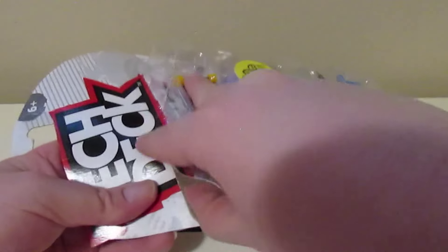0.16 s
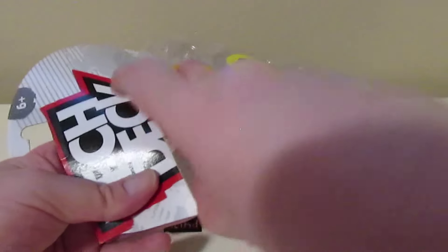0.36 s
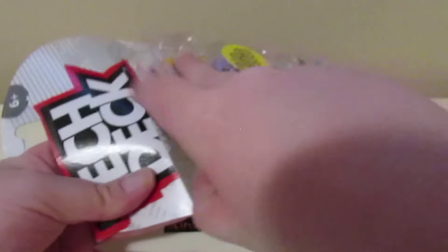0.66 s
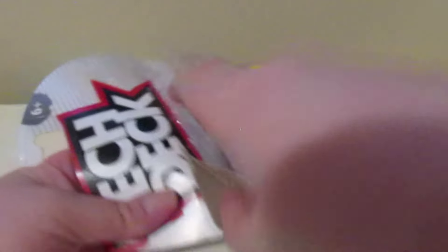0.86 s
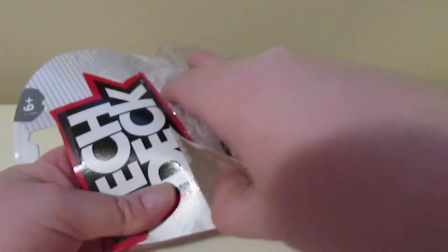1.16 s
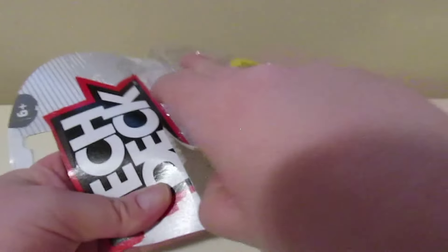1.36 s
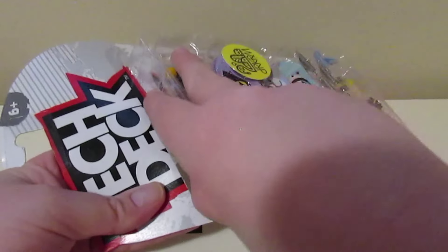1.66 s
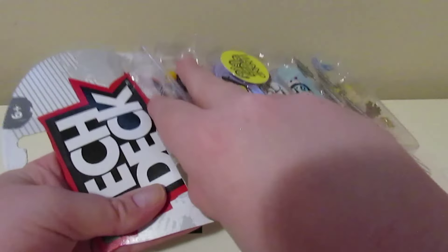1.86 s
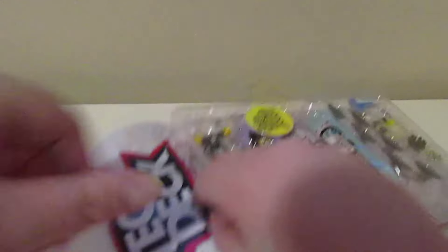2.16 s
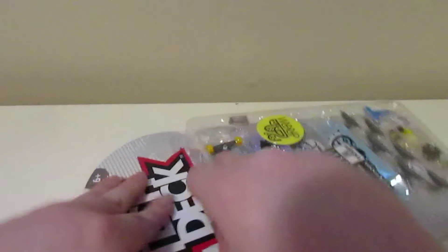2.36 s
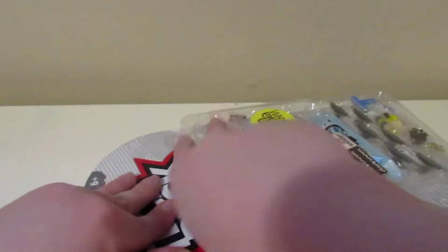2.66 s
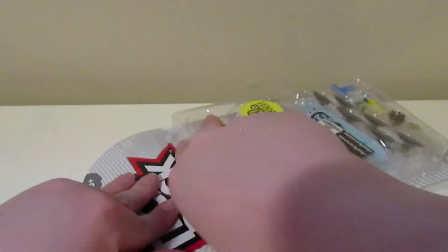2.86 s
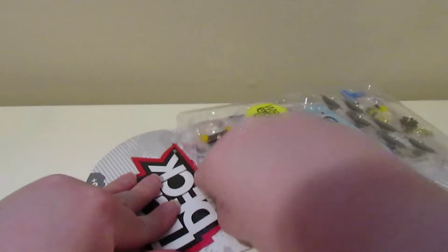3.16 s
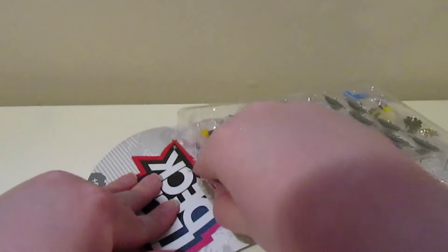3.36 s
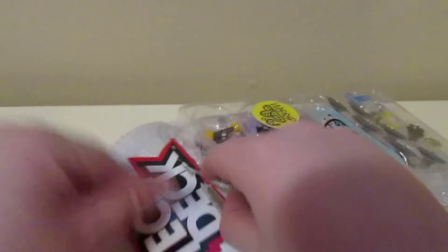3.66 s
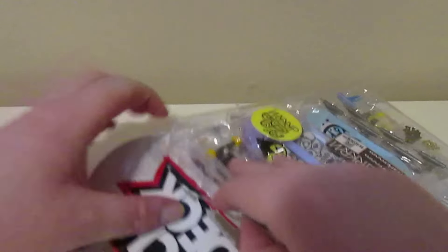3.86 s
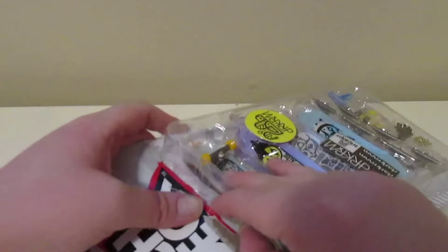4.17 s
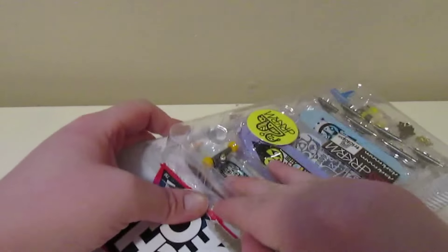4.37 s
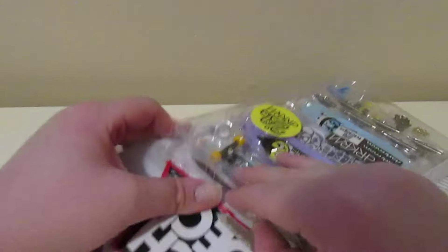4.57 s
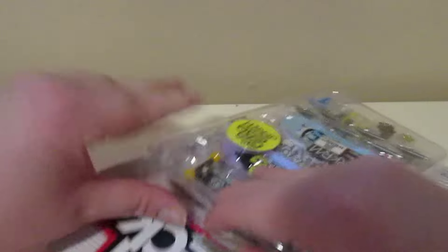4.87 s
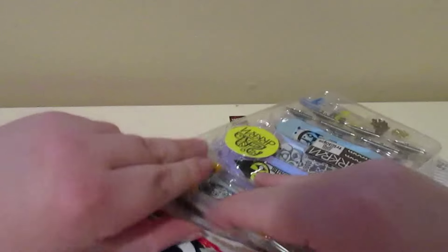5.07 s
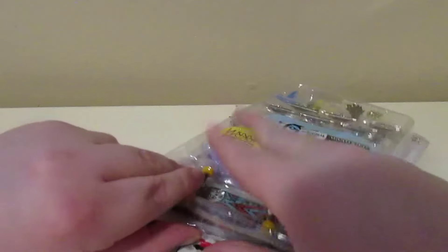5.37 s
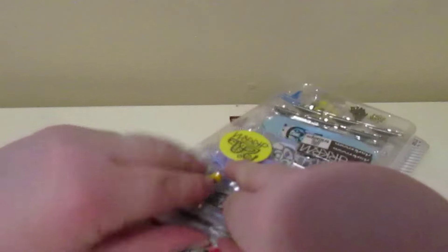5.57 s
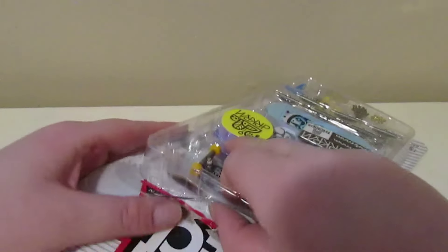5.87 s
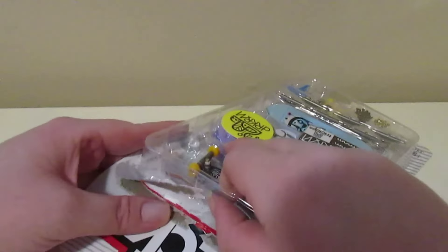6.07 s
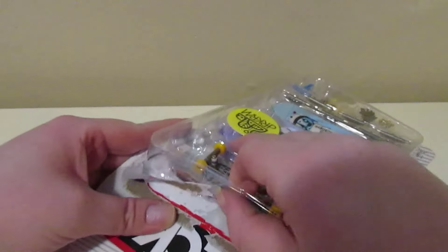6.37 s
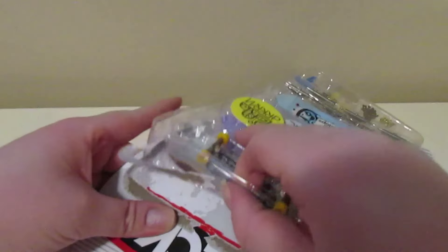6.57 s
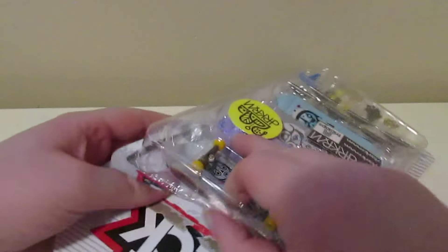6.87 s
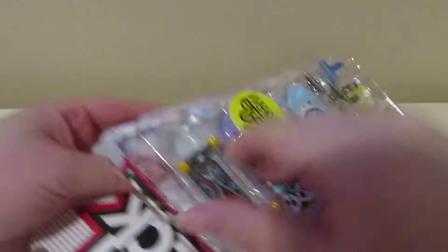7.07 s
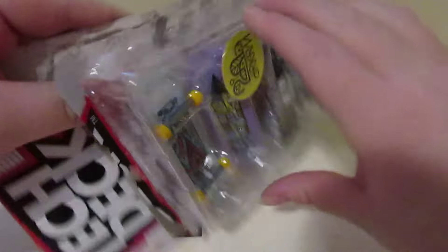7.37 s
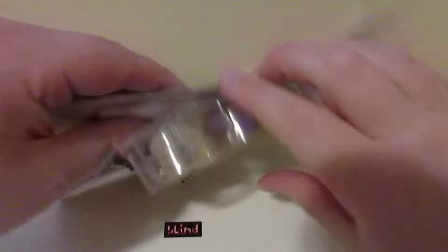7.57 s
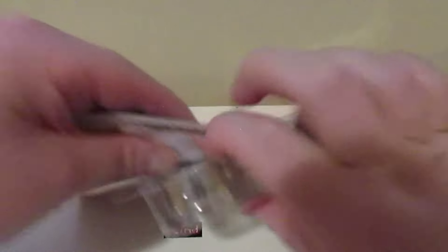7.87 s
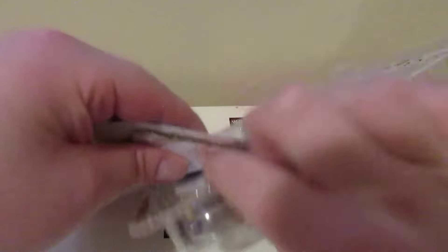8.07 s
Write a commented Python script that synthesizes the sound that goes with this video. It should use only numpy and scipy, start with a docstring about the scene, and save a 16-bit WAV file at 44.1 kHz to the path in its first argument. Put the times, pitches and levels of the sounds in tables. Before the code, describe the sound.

Irregular loud plastic cracks, small pops, card rubbing and brief glue tears, with a few dull table knocks, close up indoors over faint hiss.

```python
"""A stiff clear plastic blister is pried off its cardboard back by hand on a table in a small room.
Creases flip in sharp snaps: a step and a ragged noise burst through resonances of film and hollow.
Small dents ping, walls creak, glue tears in swells; fingers rub the card and crinkle the film.
The card slaps and slides on the table, with a few low thuds, over room tone and hiss.
Both channels are the same."""
import sys
import numpy as np
from scipy import signal
from scipy.fft import rfft, irfft, next_fast_len
from scipy.io import wavfile

SR = 44100
rng = np.random.default_rng(int(sys.argv[2]) if len(sys.argv) > 2 else 0)


def bounce(signal):
    """Save signal as a 16-bit WAV file at the path given by the first command-line argument."""
    frames = np.transpose(np.atleast_2d(signal))
    limited = np.clip(frames, -1, 1)
    pcm = np.round(limited * 32767).astype(np.int16)
    wavfile.write(sys.argv[1], SR, pcm)


N = 362943  # samples

# Room tone and microphone hiss, spectral shape: f/Hz, level/dB
QUIET_SPECTRUM = [(300, -5), (1000, -16.5), (4000, -18), (16000, -32)]
# Decay of walls and table top: f/Hz, t60/s
ROOM_DECAY = [(200, 0.19), (1400, 0.2), (9700, 0.22)]
# Card on the table, resonances: f/Hz, width/Hz, level/dB
CARD_MODES = [(291, 78, -9), (380, 240, -14.5)]
# Card slaps the table: t/s, level/dB
CARD_SLAPS = [(0.851, -28.5), (2.274, -27.5), (2.405, -21.5), (2.443, -23.5), (2.848, -14.5), (3.397, -30),
              (3.94, -32), (4.158, -28), (4.525, -25), (5.268, -27), (6.22, -20.5), (7.549, -19.5)]
# Low thuds, the one at 3.169 s a low bump under a loud snap: t/s, level/dB
LOW_THUDS = [(2.275, -35), (2.847, -20.5), (3.169, -32.5), (5.585, -30)]
# Handling levels, interpolated: t/s, rub of card and fingers/dB, crinkle of film/dB
HAND_LEVELS = [(0.0, -51.5, -56), (0.37, -44.5, -48.5), (1.72, -52, -51), (1.99, -36.5, -44),
               (2.25, -47.5, -53), (3.05, -38.5, -45), (3.21, -58.5, -48.5), (3.78, -49.5, -62),
               (4.56, -49.5, -47.5), (5.11, -51.5, -68), (5.91, -61, -74), (6.58, -81, -38),
               (6.85, -43.5, -80), (7.1, -51, -58), (7.47, -56, -66), (8.23, -44, -39.5)]
# Rub of card and fingers, spectral shape: f/Hz, level/dB
RUB_SPECTRUM = [(59, -28), (248, 7), (693, 4), (1750, -0.5), (6000, -21.5), (13200, -120)]
# Stirred film, spectral shape: f/Hz, level/dB
FILM_SPECTRUM = [(1200, -7.5), (3000, 0.5), (6500, 0.5), (15000, -11)]
# Card slides on the table: t of top/s, length/s, level/dB
CARD_SLIDES = [(7.211, 0.21, -45.5), (7.426, 0.034, -38)]
# Glue tears: t of top/s, length/s, level/dB, film re tear/dB
GLUE_TEARS = [(0.892, 0.1, -33, -7), (1.452, 0.042, -33, 7), (2.025, 0.029, -22.5, -5),
              (2.099, 0.086, -36.5, -2), (2.317, 0.061, -23, -19), (4.743, 0.17, -40, -5),
              (5.477, 0.074, -31.5, -19), (3.086, 0.023, -40.5, 8.5), (6.012, 0.18, -43.5, 4.5),
              (6.271, 0.061, -35.5, -1), (6.47, 0.12, -34.5, -3.5), (7.566, 0.084, -31, -6.5),
              (7.673, 0.021, -35.5, -14.5), (7.978, 0.067, -34.5, -21), (8.178, 0.084, -32.5, 2.5)]
# Air and walls of the blister, resonances: f/Hz, width/Hz, level/dB
HOLLOW_MODES = [(745, 2340, 8), (1155, 464, 14.5)]
# Soft slips of a blister wall: t/s, level/dB
WALL_CREAKS = [(0.575, -38), (0.855, -27.5), (1.813, -30), (1.849, -34), (2.445, -19), (3.5947, -32),
               (4.9546, -37), (5.2673, -20), (5.4334, -27.5), (6.147, -29), (6.221, -22), (6.413, -27.5),
               (6.705, -32.5), (6.771, -32.5), (7.501, -32)]
# Small dents pop: t/s, nominal peak level/dB, f/Hz
DENT_PINGS = [(0.3592, -16, 2280), (0.9614, -15, 2260), (1.885, -22, 3660), (2.1636, -12, 2750),
              (3.6324, -30, 5660), (3.936, -18, 2900), (4.032, -20, 3000), (4.0679, -15, 3200),
              (4.1637, -14.5, 3230), (4.2656, -21.5, 6200), (4.2973, -23.5, 3200), (4.468, -22, 5030),
              (4.6073, -25.5, 3030), (5.0876, -30, 2210), (5.725, -23, 4370), (6.305, -23.5, 3040),
              (6.849, -20, 2970), (7.9065, -29.5, 3370), (8.1656, -17, 2590), (8.2049, -16.5, 3730)]
# Creases flip: t/s, nominal peak level/dB, crack f/Hz, hollow re peak/dB, treble re rest/dB
CREASE_SNAPS = [(0.2559, -10.5, 3770, -16.5, -3), (0.4149, -1.5, 2340, -18, -10.5),
                (0.4386, -1, 2400, -10.5, -5.5), (0.4672, -7, 2030, -30, -7),
                (0.659, -8, 2160, -14.5, -0.5), (0.925, -10.5, 3000, -20.5, -4.5),
                (0.9744, -2.5, 2620, -17.5, -2), (1.1068, -2.5, 3030, -21.5, -3.5),
                (1.246, -13.5, 4250, -17.5, 2), (1.474, -4.5, 1980, -21, -4),
                (1.7709, -17.5, 3460, -11, -3), (1.91, -20, 1900, -2.5, -2.5),
                (2.2699, -7.5, 1800, -12, -7), (2.4066, -14.5, 1840, -1.5, 1.5),
                (2.6552, -4.5, 1790, -16.5, -2.5), (2.853, -20.5, 1980, 8.5, -3.5),
                (3.1143, -8.5, 7300, -15, 3.5), (3.169, -4, 1980, -14, 0), (3.4017, -22.5, 3940, -14, 4),
                (3.4278, -5.5, 2270, -11, -7.5), (3.4409, -5, 2270, -14, -3),
                (3.5531, -22.5, 1890, -2.5, -4.5), (4.5286, -0.5, 5650, -19.5, -7),
                (4.733, -15.5, 2150, -5, 0.5), (5.1086, -6.5, 3350, -9, 0.5), (5.175, -21, 1820, -5, -1),
                (5.233, -12.5, 3880, -9.5, 3), (5.5529, -13, 4970, -4, 4.5),
                (5.582, -5.5, 2230, -14.5, -8.5), (5.662, -13, 5500, -17.5, 4.5),
                (5.7531, -14.5, 4840, -10.5, -2), (6.011, -2.5, 6500, -9.5, -1),
                (6.0336, -2.5, 4600, -16, -6.5), (6.042, -13, 2740, -22, -1), (6.5375, -4, 1860, -7, -4),
                (6.6315, -6, 2530, -18.5, -12.5), (6.7313, -13, 2150, -15.5, -3.5),
                (6.8654, -17.5, 3580, -11.5, -1.5), (6.92, -10.5, 4330, -12, 4.5),
                (6.9342, -8.5, 1920, -15, -4.5), (7.01, -20, 2220, -3, -3), (7.0299, -16, 2130, -8, -3.5),
                (7.5521, -13.5, 2360, -3.5, -3)]

SLIDE_HZ, TEAR_HZ = 607, 980  # broad pitches
GRIT_RATIO = .9  # creases re even rub
CRACK_DB = -8.5  # crack burst re nominal peak
STEP_PER_KHZ = 3.4  # leading step of a crack: small, high dents flip most abruptly
SIZZLE_DB, SIZZLE_DB_PER_RING_DB = -31.5, -1.18  # less hollow ring, more sizzle
TREBLE_HZ = 6160  # corner of the treble shelf of a snap
TOP_HZ = 16300  # band limit


def amp(db):
    """Decibels to amplitude ratio."""
    return 10 ** (np.asarray(db) / 20)


def unit(x):
    """Scales each row to rms 1."""
    return x / np.sqrt(np.mean(x ** 2, axis=-1, keepdims=True) + 1e-20)


def along(points, hz):
    """Interpolates (f/Hz, value) points on a log frequency axis."""
    f, v = np.transpose(points)
    return np.interp(np.log(hz + 1), np.log(f + 1), v)


def filtered(x, response):
    """Multiplies the spectrum of x by a complex frequency response."""
    n = x.shape[-1]
    m = next_fast_len(n + 4096)
    return irfft(rfft(x, m) * response(np.fft.rfftfreq(m, 1 / SR)), m)[..., :n]


def peak(f, hz, width_hz):
    """Response of one causal resonance."""
    return 1j * f * width_hz / (hz * hz - f * f + 1j * f * width_hz)


def modes(table):
    """Response of parallel resonances of alternating sign."""
    return lambda f: sum((-1) ** k * amp(db) * peak(f, hz, w) for k, (hz, w, db) in enumerate(table))


def place(rows, times_s):
    """Sums short sounds into one track."""
    at = np.round(times_s * SR).astype(int)[:, None] + np.arange(rows.shape[1])
    return np.bincount(at.ravel(), rows.ravel(), N + SR)[:N]


def shaken(t60_s, spike, response, level_db):
    """One ragged burst per row, led by a sharp step, through a body; a fainter tail mutters on."""
    t = np.arange(SR // 9) / SR
    lumps = np.repeat(rng.standard_normal((len(level_db), len(t) // 50)), 50, axis=1)
    fade = amp(-60 * t / t60_s) + amp(-8.5 - 60 * t / 0.14)
    burst = rng.standard_normal((len(level_db), len(t))) * amp(3.1 * lumps) * fade
    burst *= 1 - np.exp(-t / 0.00027)
    burst[:, 0] = -spike
    # level: rms with the energy of the row packed into 256 samples
    return amp(level_db) * unit(filtered(burst, response)) * np.sqrt(256 / len(t))


def crackle(count, spread_db, t60_s):
    """Noise swelling in random slips of unequal size, each a short puff, on an even bed."""
    start, size = rng.random((count, 2)).T
    t = np.arange(SR // 30) / SR
    puff_power = amp(-120 * t / t60_s) * (1 - np.exp(-t / .0015))
    slip_power = amp(-spread_db * np.log(size + .06))[:, None] ** 2
    power = place(slip_power * puff_power, start * N / SR)
    return np.sqrt(power / np.median(power) + 1.08) * rng.standard_normal(N)


def grit(count, hz, cycles, spread_db):
    """Clumps of tiny creases, each a brief chirp at its own pitch, most near one pitch."""
    clump, lag, size, high = rng.random((count, 4)).T[:, :, None]
    start_s = np.floor(clump * 160) / 160 * N / SR + .06 * lag
    pitch_hz = hz * 5 ** (high ** 2.5 - .12)
    t = np.arange(SR // 60) / SR
    envelope = pitch_hz * t * np.exp(-pitch_hz * t / cycles)
    rows = amp(-spread_db * np.log(size + 0.04)) * envelope * np.sin(2 * np.pi * pitch_hz * t)
    return unit(place(rows, start_s[:, 0]))


def swells(top_s, length_s, db, hz, breadth, film_db):
    """Dense fine slips swell and fade around a broad pitch and stir the film."""
    half = SR // 4
    slips = crackle(count=2500, spread_db=5.5, t60_s=0.02)
    rows = slips[(np.arange(len(top_s))[:, None] * half + np.arange(2 * half)) % N]

    def body_response(f):
        pitch = peak(f, hz, breadth * hz) + 1.4 * peak(f, hz, 0.14 * hz)
        return pitch * peak(f, hz, 3.6 * breadth * hz)

    body = unit(filtered(rows, body_response))
    film = unit(filtered(rows, lambda f: amp(along(FILM_SPECTRUM, f))))
    swell = amp(db) * np.exp(-(2 * np.arange(-half, half) / SR / length_s) ** 2)
    return place(swell * (body + amp(film_db) * film), top_s[:, 0] - half / SR)


def random_colour(count):
    """Each burst is coloured by nine randomly drawn narrow resonances."""
    hz = 600 * 9 ** rng.random((count, 9))
    return lambda f: 1 + .9 * sum(peak(f, hz[:, [k]], .07 * hz[:, [k]]) for k in range(hz.shape[1]))


def quiet():
    """Room tone and hiss as shaped noise, with a thin fuzzy whine high up."""
    tone = unit(filtered(rng.standard_normal(N), lambda f: amp(along(QUIET_SPECTRUM, f))))
    whine = unit(filtered(rng.standard_normal(N), lambda f: peak(f, 11700, 620) ** 2))
    return amp(-57) * tone + amp(-72) * whine


def room(x):
    """Near walls and table top: each frequency dies at its own speed; a new noise tail every 0.1 s."""
    step, delay = SR // 10, 130  # samples
    wet = np.zeros(N + SR)
    for a in range(0, N, step):
        hz, t, z = signal.stft(rng.standard_normal(SR // 3), SR, nperseg=256)
        decay = amp(-60 * t / along(ROOM_DECAY, hz)[:, None])
        tail = signal.istft(z * decay, SR, nperseg=256)[1]
        answer = signal.fftconvolve(x[a:a + step], tail / np.linalg.norm(tail))
        wet[a + delay:][:len(answer)] += answer
    return wet[:N]


def thuds():
    """Low thuds: a strong step and a noise burst through two low resonances."""
    s, db = np.transpose(LOW_THUDS)[:, :, None]
    return place(shaken(0.099, 14, lambda f: peak(f, 146, 32.0) + 0.88 * peak(f, 87, 67), db), s[:, 0])


def knocks():
    """The card slaps the table and rings low."""
    s, db = np.transpose(CARD_SLAPS)[:, :, None]
    return place(shaken(0.065, 4.9, lambda f: modes(CARD_MODES)(f) * peak(f, 190, 760), db), s[:, 0])


def slides():
    """The card slides on the table: lower than a tear, the film nearly still."""
    top_s, length_s, db = np.transpose(CARD_SLIDES)[:, :, None]
    return swells(top_s, length_s, db, SLIDE_HZ, breadth=0.65, film_db=-45)


def handling():
    """Fingers slide on the card and bend the film; shared slips sound in both, the rub rings the hollow."""
    s, rub_db, film_db = np.transpose(HAND_LEVELS)
    t = np.arange(N) / SR
    shared = crackle(count=700, spread_db=3.5, t60_s=.04)
    film_slips = shared + crackle(count=1800, spread_db=10, t60_s=0.025)
    rub = filtered(shared, lambda f: amp(along(RUB_SPECTRUM, f)) * (1 + 0.26 * peak(f, 970, 240)))
    film = filtered(film_slips, lambda f: amp(along(FILM_SPECTRUM, f)))
    creases = grit(count=1800, hz=1168, cycles=1.6, spread_db=4.5)
    rub_part = amp(np.interp(t, s, rub_db)) * (unit(rub) + GRIT_RATIO * creases)
    return rub_part + amp(np.interp(t, s, film_db)) * unit(film)


def tears():
    """Glue lets go in short swells of fine slips that stir the film."""
    top_s, length_s, db, film_db = np.transpose(GLUE_TEARS)[:, :, None]
    return swells(top_s, length_s, db, TEAR_HZ, 1.55, film_db)


def creaks():
    """A blister wall slips without cracking: a short chirp of the hollow with a faint edge."""
    s, db = np.transpose(WALL_CREAKS)[:, :, None]
    return place(shaken(0.023, 0.96, lambda f: modes(HOLLOW_MODES)(f) * peak(f, 1280, 1900), db), s[:, 0])


def pings():
    """A small dent pops: a short burst around its own pitch, low in treble, that stirs the hollow."""
    s, db, hz = np.transpose(DENT_PINGS)[:, :, None]
    colour = random_colour(count=len(s))

    def body(f):
        ring = peak(f, hz, 0.98 * hz) ** 2 + 0.21 * modes(HOLLOW_MODES)(f)
        return ring * colour(f) / (1 + 1j * f / (2 * hz)) ** 4

    return place(shaken(0.015, 6.7, body, db + CRACK_DB), s[:, 0])


def snaps():
    """A crease flips: a sharp step and a burst of tiny fractures shake film and hollow."""
    s, db, hz, ring_db, treble_db = np.transpose(CREASE_SNAPS)[:, :, None]
    treble, colour = amp(treble_db), random_colour(count=len(s))

    def crack_response(f):
        # high dents ping more clearly
        pitch = hz / 3000 * peak(f, hz, 680) + 1.15 * peak(f, 3500, 5100)
        return pitch * peak(f, hz, 5700)

    def shell_response(f):
        x = f / TREBLE_HZ
        lowpass = 1 / (1 + 1j * np.sqrt(2) * x - x ** 2) ** 2
        return (treble + (1 - treble) * lowpass) * amp(-3.5) * colour(f)

    sizzle_db = db + SIZZLE_DB + SIZZLE_DB_PER_RING_DB * ring_db
    crack = shaken(0.012, STEP_PER_KHZ * hz[:, 0] / 1e3, crack_response, db + CRACK_DB)
    hollow = shaken(0.017, 0.42, lambda f: modes(HOLLOW_MODES)(f) * peak(f, 940, 3450), db + ring_db)
    sizzle = shaken(0.017, 0.32, lambda f: peak(f, 6920, 4700) ** 2, sizzle_db)
    return place(filtered(crack + hollow + sizzle, shell_response), s[:, 0])


def scene():
    """The pack, its room and the quiet behind it, alike in both channels."""
    blows = snaps() + pings() + creaks() + knocks() + thuds()
    hands = handling() + tears() + slides()
    sound = blows + hands + room(amp(-11) * blows + amp(-7) * hands) + quiet()
    return np.array([sound, sound])


def record(dry):
    """Clips at full scale; the microphone has a narrow dip and fades into a steep band limit."""
    def microphone(f):
        dip = 1 - .5 * peak(f, 7860, 270)
        fade = amp(-16 / (1 + np.exp((15700 - f) / 150)))
        return (f < TOP_HZ) * dip * fade

    return filtered(np.clip(dry, -1, 1), microphone)


dry = scene()
out = record(dry)
bounce(out)
```